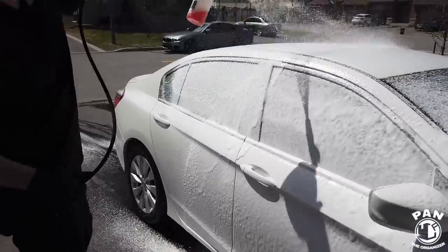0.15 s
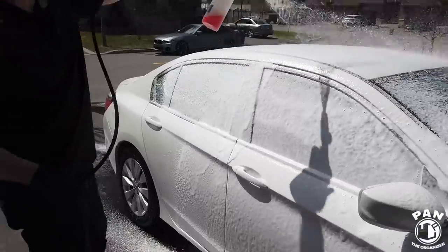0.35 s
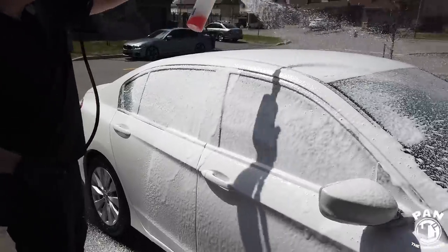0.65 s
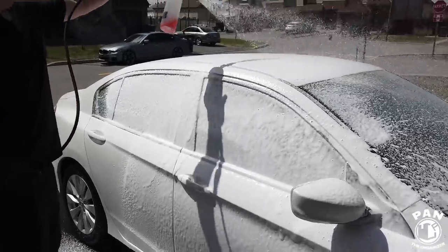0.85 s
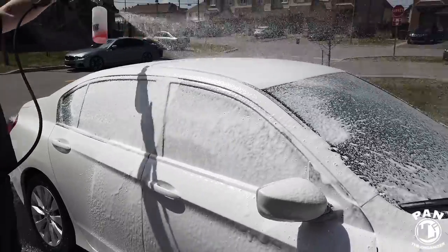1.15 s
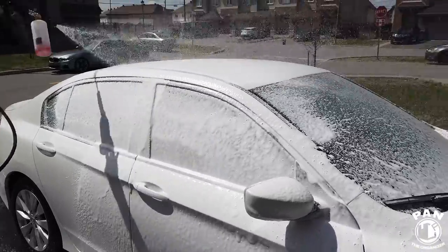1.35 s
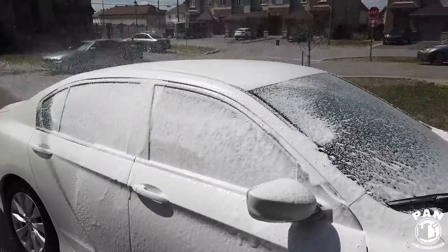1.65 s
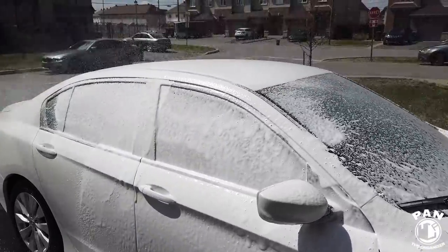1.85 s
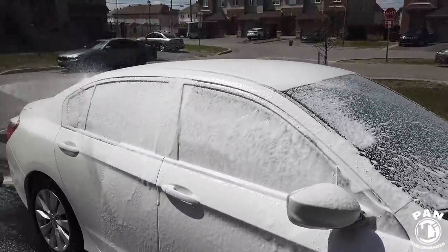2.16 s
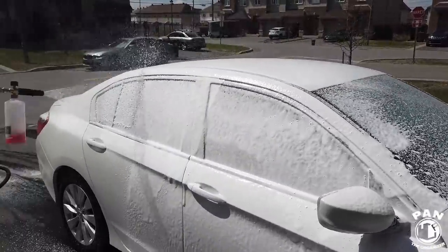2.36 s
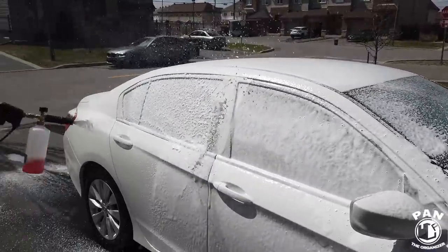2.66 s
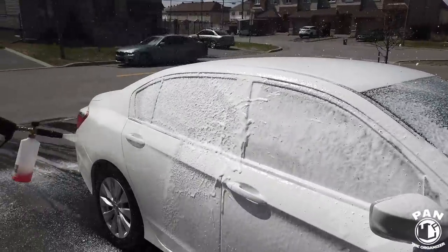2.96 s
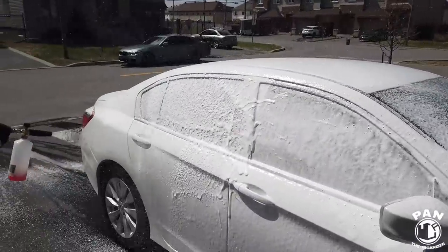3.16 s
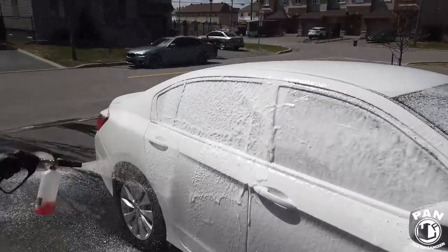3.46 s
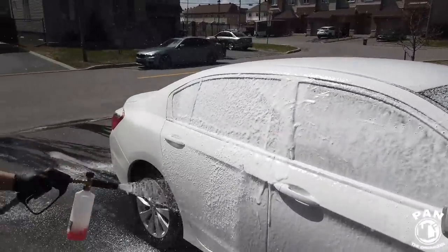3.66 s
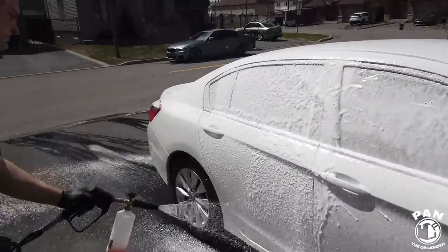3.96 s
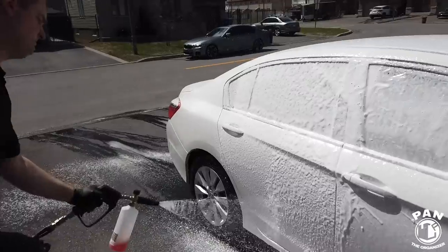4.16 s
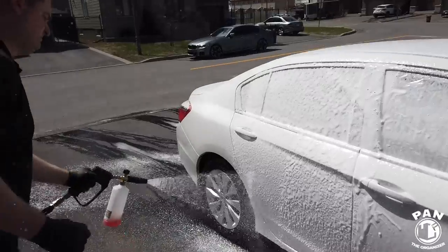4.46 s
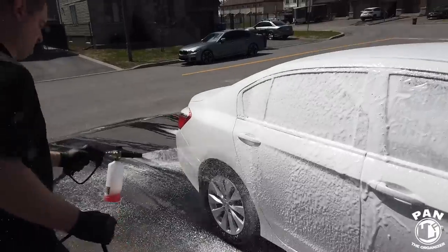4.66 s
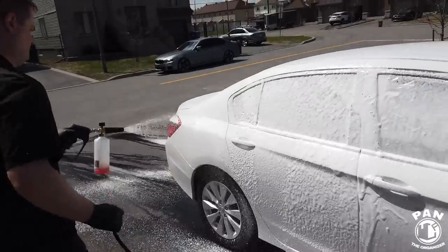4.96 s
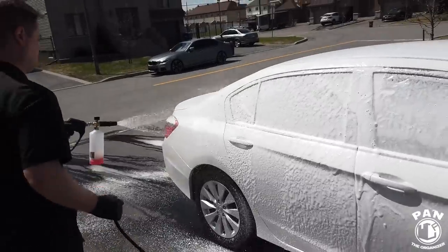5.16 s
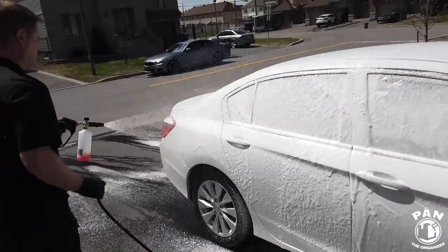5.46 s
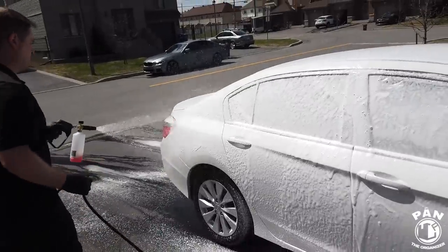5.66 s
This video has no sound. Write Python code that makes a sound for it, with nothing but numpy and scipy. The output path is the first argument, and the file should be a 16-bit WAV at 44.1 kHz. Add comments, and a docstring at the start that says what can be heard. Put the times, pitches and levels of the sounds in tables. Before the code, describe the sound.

Outdoors in a driveway, a foam jet first rasps and spits in a narrow mid-high band over a car roof. The rasp fades, wind thumps the microphone, then the nozzle comes close with a bright, sharp hiss. Foam patters on the panels and drums softly in the wheel arch before the hiss eases. A pump hums faintly behind. Close stereo microphone.

```python
"""A jet of foam rasps over a car's roof, then washes the panels and drums in the wheel arch.
It comes from a foam cannon on a pressure washer, in a driveway, and the nozzle hisses once it comes near.
Jet and foam are coloured noise, drop impacts and sliding resonances; moving echoes sweep their colour.
Behind them the pump hums some way off as a stack of wavering tones, and gusts buffet the microphone."""
import sys
import numpy as np
from scipy import signal
from scipy.fft import rfft, irfft, next_fast_len
from scipy.io import wavfile
from scipy.ndimage import uniform_filter1d, map_coordinates

SR = 44100
rng = np.random.default_rng(int(sys.argv[2]) if len(sys.argv) > 2 else 0)


def wav_record(signal):
    """Record a signal, one row per channel, as 16-bit PCM in the file named by sys.argv[1]."""
    frames = np.transpose(np.atleast_2d(signal))
    bounded = np.clip(frames, -1, 1)
    # unit amplitude maps onto the largest positive 16-bit level
    quanta = np.round(bounded * 32767).astype(np.int16)
    wavfile.write(sys.argv[1], SR, quanta)


N = 256220
TIME = np.arange(N) / SR
FREQS = np.arange(N // 2 + 1) * SR / N
SIDES = np.array([[1], [-1]])  # the side signal is added on the left and subtracted on the right

# The walk along the car. Each row: time in seconds, place
# (0 front door, 1 back door, 2 rear wheel, 3 bumper; fractions lie between).
WALK = [(0, 1.4), (1.4, 0), (2.3, 1.23), (3.3, 1.2), (4.1, 2), (5.8, 3.5)]


def from_db(db):
    """Decibels to gain."""
    return 10 ** (np.asarray(db) / 20)


def rms_one(x):
    """Scale to rms 1."""
    return x / np.sqrt(np.mean(x ** 2) + 1e-20)


def in_time(rows):
    """Join the rows of a table into one curve over time for each column."""
    seconds, *columns = np.transpose(rows)
    return [np.interp(TIME, seconds, column) for column in columns]


def during(rows):
    """Gain 1 over the span of a table, dying away on either side."""
    fade_s = 0.04
    outside_s = np.abs(TIME - np.clip(TIME, rows[0][0], rows[-1][0]))
    return np.exp(-outside_s / fade_s)


def swells(rows):
    """Summed gain of bell-shaped swells, from rows of centre in seconds, peak in dB, spread in seconds."""
    return sum(from_db(db) * np.exp(-.5 * ((TIME - s) / length) ** 2) for s, db, length in rows)


def white():
    """Fresh white noise."""
    return rng.standard_normal(N)


def drift(rate_hz):
    """Slow random wander with rms 1, drawn at every eighth sample; the rate is its 6 dB down point."""
    size = next_fast_len(N // 8 + 1)
    hz = np.arange(size // 2 + 1) * SR / 8 / size
    slow = irfft(rfft(rng.standard_normal(size)) / (1 + (hz / rate_hz) ** 2), size)
    return np.interp(np.arange(N) / 8, np.arange(size), rms_one(slow))


def colour(x, spectrum):
    """Filter to the shape of a spectrum, falling 60 dB per octave past its ends; rms 1."""
    hz, db = np.transpose(spectrum)
    octave = np.log2(FREQS + 1)
    outside = np.abs(octave - np.clip(octave, np.log2(hz[0]), np.log2(hz[-1])))
    gain = from_db(np.interp(octave, np.log2(hz), db) - 60 * outside)
    return rms_one(irfft(rfft(x) * gain, N))


def resonance(centre_hz, width_hz):
    """Noise ringing in one narrow resonance whose centre may move, fading off to either side; rms about 1."""
    phase = 2 * np.pi * np.cumsum(centre_hz + np.zeros(N)) / SR
    return drift(width_hz) * np.cos(phase) + drift(width_hz) * np.sin(phase)


def droplets(per_s, spread_db, share):
    """Turbulent noise mixed with countless drop impacts of uneven size; share is the impacts' power."""
    share = np.clip(share, 0, 1)
    size_db = spread_db * np.minimum(rng.exponential(1, N), 4)
    sizes = from_db(size_db) * np.sign(white())
    impacts = rms_one(sizes * (rng.random(N) < per_s / SR))
    return np.sqrt(share) * impacts + np.sqrt(1 - share) * white()


def across(x, focus):
    """Difference of two close microphone ports: direct sound a quarter cycle off, scattered sound unrelated."""
    focus = np.clip(focus, 0, 1)
    direct = -1j * focus * rfft(x)
    scattered = np.sqrt(1 - focus ** 2) * rfft(white()) * np.std(x)
    return irfft(direct + scattered, N)


def delayed(x, delay_ms, order):
    """Read both channels through a moving delay, interpolating between samples."""
    position = np.arange(N) - delay_ms * SR / 1000
    return np.array([map_coordinates(side, [position], order=order, mode="mirror") for side in x])


def rasp():
    """The jet sputters in a narrow, sliding resonance as it skims the roof, and fades as it leaves."""
    # Each row: time in seconds, level in dB before the mix, centre of the resonance in Hz.
    path = [(0, -43.5, 2000), (.1, -35.5, 1965), (.37, -37.5, 2080), (.52, -39, 2036), (.7, -44.5, 1985),
            (.8, -38, 1945), (1.0, -38.5, 2003), (1.2, -44.5, 2079), (1.33, -47, 2020), (1.45, -53, 1994)]
    # Spits. Each row: centre in seconds, peak in dB before the mix, bell spread in seconds.
    spits = [(.153, -35, 0.0026), (.243, -32, .004), (.329, -34, 0.0013), (.348, -31.5, 0.0055),
             (.388, -38, .003), (.402, -33.5, .004), (.418, -30, .004), (.457, -42, .002),
             (.482, -36, .002), (.8, -44, 0.003)]
    # Resonance skirt and faint upper band. Each row: frequency in Hz, relative density in dB per Hz.
    spectrum = [(1300, -56), (1750, -14), (1900, -0.5), (2060, 2.5), (2200, -6.5), (2450, -5),
                (3200, -20.5), (4800, -46), (6200, -18), (8500, -56)]
    level_db, centre_hz = in_time(path)
    gain = np.hypot(from_db(level_db) * during(path), swells(spits))
    skirt = from_db(-2.5) * colour(white() * from_db(drift(44)), spectrum)
    core = from_db(-3.5) * resonance(centre_hz, width_hz=80)
    sound = gain * (skirt + core)
    return sound + .5 * across(sound, focus=1.0) * SIDES


def hiss(level_db, side_db):
    """Air and soap shear in the nozzle: turbulent noise with moving treble and a separate side colour."""
    # Colours in the middle and at the sides. Each row: frequency in Hz, relative density in dB per Hz.
    middle_spectrum = [(4000, -14.5), (5000, -10), (6300, -8.5), (7300, -3.5), (8500, 1.5), (9600, 1),
                       (10400, 1.5), (11300, -2), (12500, -2), (14000, -6), (16000, -8)]
    side_spectrum = [(3240, -33), (6000, -14), (8200, -2.5), (10600, 0), (12600, -3.5), (14000, -13.5),
                     (16000, -9)]
    # Highest treble against the rest. Each row: time in seconds, gain in dB.
    treble = [(0, 2), (.8, -2.5), (1.3, -3), (2.1, -0.5), (2.27, 3), (2.55, -2), (2.9, -2.5), (3.38, 1),
              (4.0, -0.5), (4.9, -2.5), (5.45, 2), (5.8, -2.5)]
    source = droplets(per_s=5000, spread_db=-1.5, share=0.17)
    middle = from_db(-1.0) * colour(source, middle_spectrum)
    side = from_db(side_db - 0.5) * colour(across(source, focus=.25), side_spectrum)
    sound = middle + side * SIDES
    split_hz, ramp_hz = 11400, 1500  # the treble band fades in across this ramp
    treble_share = np.clip(.5 + (FREQS - split_hz) / ramp_hz, 0, 1)
    top = irfft(rfft(sound) * treble_share, N)
    top_db, = in_time(treble)
    flutter_db = 0.67 * drift(21)
    return from_db(level_db + flutter_db) * (sound - top + from_db(top_db) * top)


def sing():
    """The nozzle sings in a thin wavering band when it points past the microphone."""
    # Each row: time in seconds, level in dB of the middle signal.
    levels = [(.1, -51.5), (.4, -58), (1.3, -58.5), (2.15, -76), (2.45, -47), (2.9, -43), (3.2, -46),
              (3.38, -47), (3.6, -42), (4.1, -41), (4.75, -47), (5.0, -64), (5.8, -66)]
    level_db, = in_time(levels)
    centre_hz = 10400 + 70 * drift(4.5)
    middle = resonance(centre_hz, width_hz=510)
    side = from_db(-3.5) * resonance(centre_hz, width_hz=430)
    return from_db(level_db) * (middle + side * SIDES)


def sizzle():
    """Fine mist strikes the wet paint as drop impacts and noise, drawn apart for left and right."""
    # Each row: time in seconds, level in dB around which the sizzle flutters.
    levels = [(.15, -42), (.35, -46.5), (.9, -47), (1.1, -54), (1.58, -49.5), (1.86, -49.5), (2.1, -46.5),
              (2.9, -43.5), (3.35, -49.5), (3.7, -43.5), (4.6, -42.5), (5.0, -48), (5.8, -55)]
    # Each row: frequency in Hz, relative density in dB per Hz.
    spectrum = [(4200, -13), (5400, -5.5), (6100, -0.5), (6700, -2), (7400, -6), (8500, -9)]
    level_db, = in_time(levels)
    pair = np.array([colour(droplets(per_s=3600, spread_db=2.5, share=0.53), spectrum) for _ in SIDES])
    flutter_db = 1.45 * drift(24)
    return from_db(level_db + flutter_db) * pair


def spray(level_db, side_db):
    """The fan of foam tears through the air and lands: noise and drop impacts, partly scattered."""
    # Colours in the middle and at the sides. Each row: frequency in Hz, relative density in dB per Hz.
    middle_spectrum = [(1100, -7.5), (1600, -19), (1900, -3.5), (2100, 0), (2550, -3.5), (3950, -2),
                       (4780, -13), (6500, -34), (11000, -120)]
    side_spectrum = [(880, -51), (1600, -20.5), (1850, -4.5), (2100, -2), (2550, -12), (3900, -13),
                     (4500, -21.5), (6500, -27), (11000, -120)]
    # How direct the spray arrives. Each row: frequency in Hz, focus from 0 scattered to 1 direct.
    directness = [(2600, 0.88), (3800, 0.55), (5000, .05), (10000, .25)]
    source = droplets(per_s=5000, spread_db=2.0, share=0.34)
    focus = np.interp(FREQS, *np.transpose(directness))
    middle = from_db(1.22) * colour(source, middle_spectrum)
    side = from_db(3.0 + side_db) * colour(across(source, focus), side_spectrum)
    flutter_db = .7 * drift(20)
    return from_db(level_db + flutter_db) * (middle + side * SIDES)


def wash(level_db):
    """Foam patters on doors and glass, mostly as drop impacts of uneven size."""
    # Each row: frequency in Hz, relative density in dB per Hz.
    spectrum = [(700, -3.5), (1000, -13.5), (1300, -4.5), (1500, 4.5), (1750, 7.5), (2000, 7), (2300, -9.5)]
    source = droplets(per_s=4000, spread_db=2.5, share=0.6)
    middle = colour(source, spectrum)
    side = from_db(-12) * colour(across(source, focus=0.97), spectrum)
    return from_db(level_db - 2.2) * (middle + side * SIDES)


def well():
    """Two hollow resonances slide as the jet plays over the bodywork and into the wheel well."""
    # Lower note over doors, wheel and bumper; upper note in the wheel well only.
    # Each row: time in seconds, centre in Hz, level in dB of the middle signal.
    lower_path = [(1.45, 1970, -55), (1.65, 2100, -63), (1.8, 1697, -54), (1.89, 2020, -43.5),
                  (1.97, 1940, -49), (2.08, 1860, -57), (2.16, 1852, -52), (2.27, 1800, -46.5),
                  (2.42, 1930, -49.5), (2.68, 2110, -44), (2.8, 1997, -51), (3.02, 1987, -56),
                  (3.2, 1980, -57), (3.35, 2003, -50.5), (3.65, 2100, -48), (3.85, 1984, -63),
                  (4.0, 1656, -50.5), (4.16, 1740, -52), (4.32, 2019, -45.5), (4.65, 1950, -50.5),
                  (4.76, 1894, -65), (4.88, 2058, -56), (5.1, 2040, -48), (5.22, 1730, -53),
                  (5.45, 1788, -54), (5.75, 1960, -54)]
    upper_path = [(3.6, 3665, -64), (3.88, 3505, -50), (4.0, 3460, -51), (4.2, 3284, -56),
                  (4.32, 3130, -57), (4.43, 3024, -49), (4.62, 2924, -54), (4.75, 2780, -57),
                  (5.0, 2624, -55)]
    lower_hz, lower_db = in_time(lower_path)
    upper_hz, upper_db = in_time(upper_path)
    lower = during(lower_path) * from_db(lower_db) * resonance(lower_hz, width_hz=70)
    upper = during(upper_path) * from_db(upper_db) * resonance(upper_hz, width_hz=63)
    sound = lower + upper
    return sound + from_db(3.5) * across(sound, focus=1.0) * SIDES


def drum():
    """Foam drums in the wheel arch, a soft low boom that is loudest while the jet is near it."""
    # Each row: frequency in Hz, relative density in dB per Hz.
    spectrum = [(150, -28), (290, -4), (385, 3), (470, -2.5), (620, -52)]
    place, = in_time(WALK)
    arch_place, fade_db = 2.08, 12  # the fade is per unit of place
    level_db = -59.5 - fade_db * np.abs(place - arch_place)
    return from_db(level_db) * colour(droplets(per_s=1100, spread_db=-5.0, share=0.15), spectrum)


def echoes(x, car, ground):
    """Moving reflections off car and ground comb the sound, so it swishes as the lance sweeps."""
    # Each row: time in seconds, delay off the car in ms, delay off the ground in ms.
    delays = [(0, 1.64, 5), (.55, 1.3, 5.8), (.7, 1.42, 5.3), (1.5, 1.35, 4.1), (2.05, 1.47, 3.94),
              (2.75, 1.88, 4.76), (3.35, 1.12, 3.65), (4.0, 1.22, 3.55), (4.3, 2.0, 2.95),
              (4.75, 2.06, 2.8), (5.3, 1.7, 3.22), (5.8, 1.08, 2.72)]
    out = x.copy()
    for delay_ms, gain in zip(in_time(delays), (car, ground)):
        out += gain * delayed(x, delay_ms, order=3)
    return out / np.sqrt(1 + car ** 2 + ground ** 2)


def wander(x, count, gain, sway_ms):
    """Glancing reflections off curved bodywork come and go, rippling the colour at random."""
    out = x.copy()
    for delay_ms in np.geomspace(.6, 5, count):
        swaying_ms = delay_ms + sway_ms * drift(1.2)
        out += gain * drift(9.4) * delayed(x, swaying_ms, order=2)
    return out / np.sqrt(1 + count * gain ** 2)


def pump():
    """The motor's mains hum, wavering tones at multiples of the pump shaft, and a rattle with each stroke."""
    # Each row: multiple of the shaft rate, then the middle level in dB rms around which the tone wavers,
    # heard at the front door, at the back door, at the rear wheel and at the bumper.
    tones = [(21, -65, -64.5, -81, -86), (24, -74, -63, -78, -72), (25, -79, -60.5, -63, -62.5),
             (28, -59, -63, -68, -65), (29, -53.5, -51, -67, -66), (33, -66, -64, -67, -65.5),
             (35, -57, -58.5, -66, -64), (36, -73, -60.5, -62, -70.5), (37, -67, -60, -67, -72),
             (39, -57, -62.5, -66.5, -71), (56, -67, -62, -72, -62), (59, -60, -65, -74, -91)]
    # Fainter tones, even along the walk. Each entry: multiple of the shaft rate.
    faint_tones = [15, 17, 19, 20, 27, 31, 38]
    # Each row: frequency in Hz, relative density in dB per Hz.
    rattle_spectrum = [(200, -2), (400, -6), (600, 1), (800, 2.5), (1150, 2.5), (1600, 3), (2500, -19)]
    shaft_hz, hum_hz = 26.32, 120
    hum_db, faint_db = -74, -73.5
    place, = in_time(WALK)
    turn = 2 * np.pi * np.cumsum(shaft_hz * (1 + 0.001 * drift(5.8))) / SR
    hum = np.sqrt(2) * from_db(hum_db) * np.sin(2 * np.pi * hum_hz * TIME)
    for multiple, *levels_db in tones + [(multiple, faint_db) for multiple in faint_tones]:
        waver_db = drift(1.5)
        level_db = np.interp(place, np.arange(len(levels_db)), levels_db) + waver_db
        phase = multiple * turn + rng.uniform(0, 2 * np.pi)
        hum += np.sqrt(2) * from_db(level_db) * np.sin(phase)
    strokes = 1 + .6 * np.cos(turn * 6)  # six strokes per turn
    distance_db = -1.5 * place
    rattle = from_db(-53.5 + distance_db) * colour(white() * strokes, rattle_spectrum)
    sound = hum + rattle
    return sound + from_db(-21.0) * across(sound, focus=0.86) * SIDES


def eddies(spectrum, shared_db):
    """Turbulence of evened-out strength at the two microphone ports, partly shared by both."""
    shared, left, right = [colour(white(), spectrum) for _ in range(3)]
    pair = from_db(shared_db) * shared + np.array([left, right])
    power = uniform_filter1d(np.mean(pair ** 2, axis=0), size=1800)  # window in samples
    return pair * np.sqrt(np.mean(power) / (power + 1e-9))


def wind():
    """Gusts and buffets at the ports, each a deep push with a quicker flutter, over a faint street rumble."""
    # Each row: centre in seconds, peak gain in dB before the breeze's wavering, bell spread in seconds.
    gusts = [(.35, -63.5, 1), (1.15, -58.5, 0.2), (1.6, -47, 0.11), (2.4, -58.5, 0.56), (5.15, -56, 0.25)]
    # Each row: centre in seconds, gain of the deep push in dB, of the flutter in dB, bell spread in seconds.
    buffets = [(0.15, -48.5, -52, 0.041), (1.14, -51, -58, .02), (1.464, -47, -51, 0.016),
               (1.524, -49, -55, 0.024), (1.616, -39.5, -43, 0.025), (1.678, -55, -42.5, .014),
               (1.734, -39, -42.5, 0.011), (1.807, -57, -43, 0.017), (2.231, -53, -48, 0.018),
               (2.327, -51, -48, 0.022), (2.57, -56, -60, 0.017), (2.64, -51, -50.5, 0.028),
               (3.056, -65, -56, 0.024), (4.572, -53, -57, 0.026), (4.92, -46, -61, 0.0096),
               (4.973, -46, -46, 0.012), (5.018, -35, -38, 0.018), (5.09, -41, -52, 0.017),
               (5.13, -37.5, -44.5, 0.0095), (5.208, -43, -65, 0.01), (5.361, -54, -52, 0.045)]
    # Deep push, quick flutter, street. Each row: frequency in Hz, relative density in dB per Hz.
    push_spectrum = [(15, -1.5), (42, 8), (75, 1), (120, -11), (200, -14.5), (400, -21.5), (700, -23),
                     (1500, -69)]
    flutter_spectrum = [(40, 4), (130, 2), (200, -7), (320, -14.5), (600, -19.5), (1200, -61)]
    street_spectrum = [(20, 2), (60, 2), (130, -1), (250, 0.5), (520, 5), (900, -9)]
    calm_db = -68  # gain between gusts, before the wavering
    breeze = np.hypot(from_db(calm_db), swells(gusts)) * from_db(4.1 * drift(10))
    push_buffets = swells([(s, db, length) for s, db, _, length in buffets])
    flutter_buffets = swells([(s, db, length) for s, _, db, length in buffets])
    push_gain = np.hypot(breeze, push_buffets)
    flutter_gain = np.hypot(from_db(-7.5) * breeze, flutter_buffets)
    push = push_gain * eddies(push_spectrum, shared_db=-7.5)
    flutter = flutter_gain * eddies(flutter_spectrum, shared_db=-1)
    street = from_db(-70.5) * colour(white(), street_spectrum)
    return push + flutter + street


def scene():
    """Hiss, spray and wash follow the swings of nozzle, fan and patter; other layers keep their own levels."""
    # Paths of the nozzle's hiss, the fan of foam and the patter on the panels.
    # Each row: time in seconds, level in dB; only the swing from a usual level counts.
    nozzle_path = [(0.03, -51), (0.81, -47), (1.01, -55), (1.58, -55.5), (2.18, -49), (2.27, -43),
                   (2.5, -36.5), (2.69, -39.5), (3.18, -34.5), (3.39, -40), (3.58, -35.5), (3.95, -37.5),
                   (4.02, -35), (5.78, -47)]
    fan_path = [(0, -46), (.72, -44), (.87, -47.5), (1.85, -48), (2.2, -47), (2.5, -43.5), (2.6, -46.5),
                (2.78, -43), (3.44, -49.5), (3.92, -43), (4.45, -44), (4.82, -48), (5.05, -48), (5.78, -52)]
    patter_path = [(0, -62), (.24, -51), (1.72, -50), (1.84, -45.5), (2.25, -46.5), (2.5, -47), (2.9, -44),
                   (3.06, -50.5), (3.8, -54.5), (4.1, -49), (4.5, -60), (4.95, -57), (5.22, -52),
                   (5.78, -54)]
    # How far off axis the jet is. Each row: time in seconds, spray side gain in dB, hiss side gain in dB.
    aim = [(0, 5.5, 2), (.55, -1.5, -1.5), (1.1, 5, 1.5), (2.55, 4, 0), (3.3, 7, -5.5), (4.2, 0, -8),
           (4.8, 5, -6.5), (5.8, 3.5, -6)]
    nozzle_swing_db = in_time(nozzle_path)[0] + 40  # usual level -40 dB
    fan_swing_db = in_time(fan_path)[0] + 47  # usual level -47 dB
    patter_swing_db = in_time(patter_path)[0] + 50  # usual level -50 dB
    spray_side_db, hiss_side_db = in_time(aim)

    # Spray, wash and hiss: base gain in dB plus the swing, scaled for wash and hiss;
    # sing and sizzle have their own levels.
    foam = spray(-48 + fan_swing_db, spray_side_db) + wash(-47.5 + 1.26 * patter_swing_db)
    mist = hiss(-40 + 0.97 * nozzle_swing_db, hiss_side_db) + sing() + sizzle()
    foam = wander(echoes(foam, car=0.26, ground=0.56), count=4, gain=0.24, sway_ms=0.1)
    mist = wander(echoes(mist, car=0.2, ground=0.14), count=4, gain=0.13, sway_ms=0.08)
    return rasp() + mist + foam + well() + drum() + pump() + wind()


def record(dry):
    """A steep elliptic low-pass cuts the top."""
    cutoff_hz, ripple_db, rejection_db = 15850, .1, 75
    low_pass = signal.ellip(12, ripple_db, rejection_db, cutoff_hz, fs=SR, output="sos")
    return signal.sosfilt(low_pass, dry)


dry = scene()
out = record(dry)
wav_record(out)
```